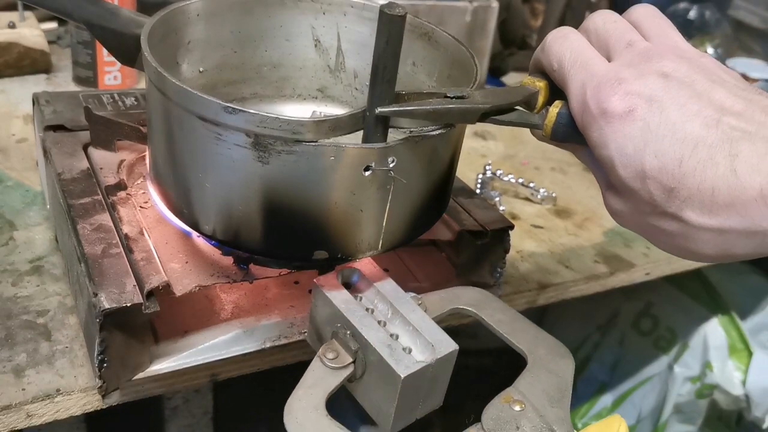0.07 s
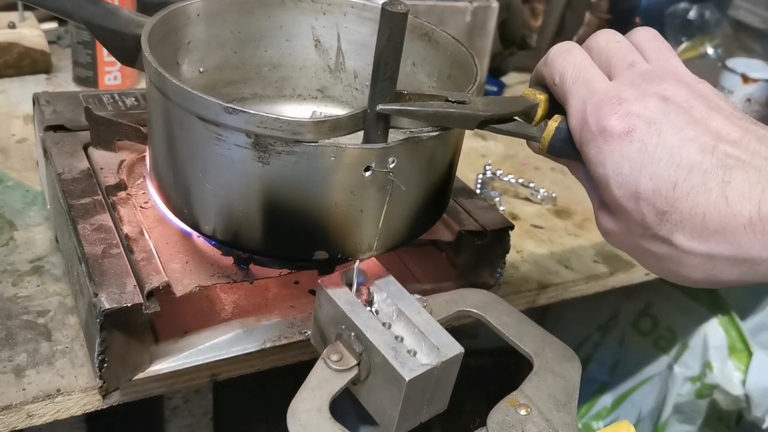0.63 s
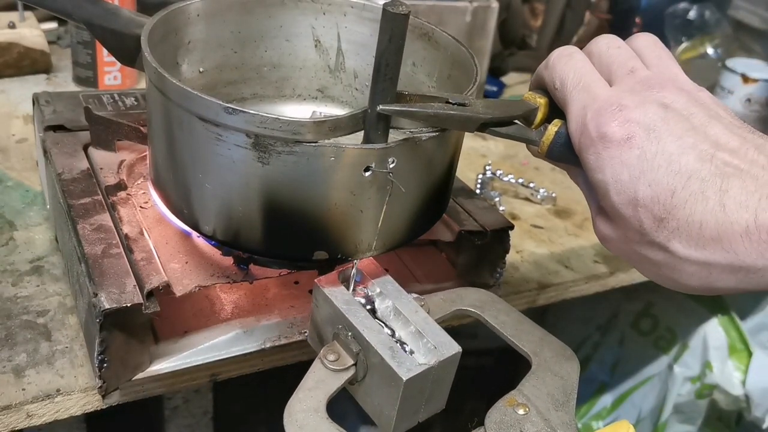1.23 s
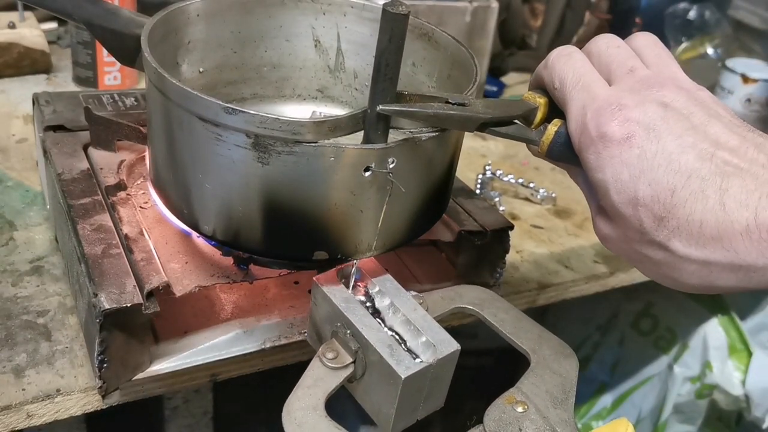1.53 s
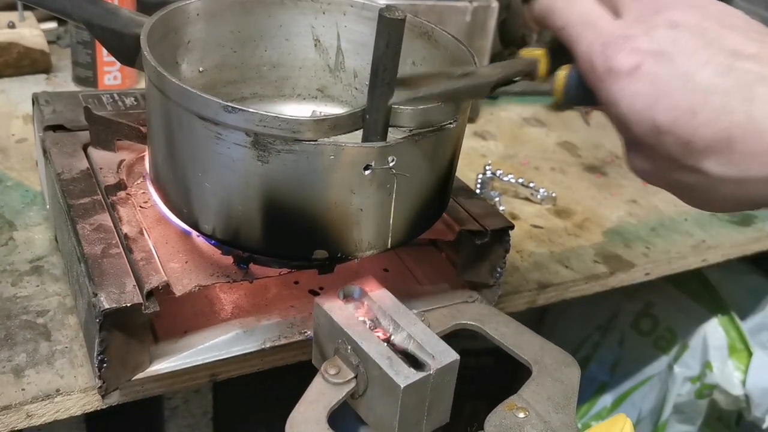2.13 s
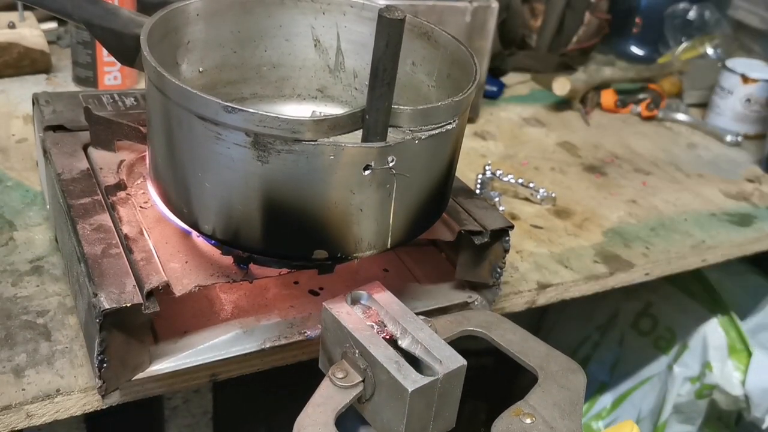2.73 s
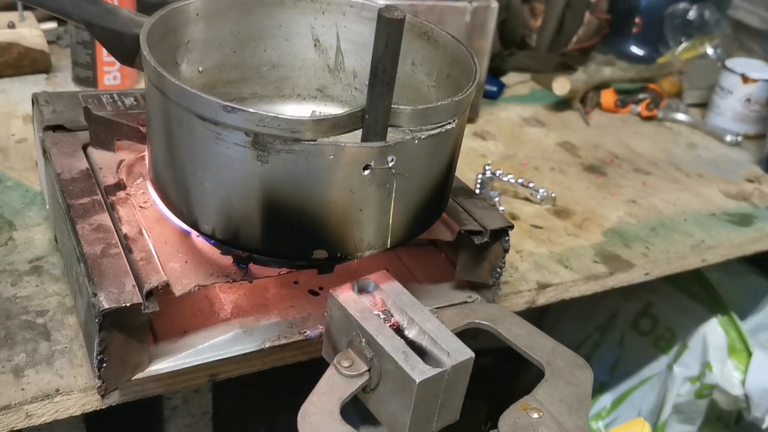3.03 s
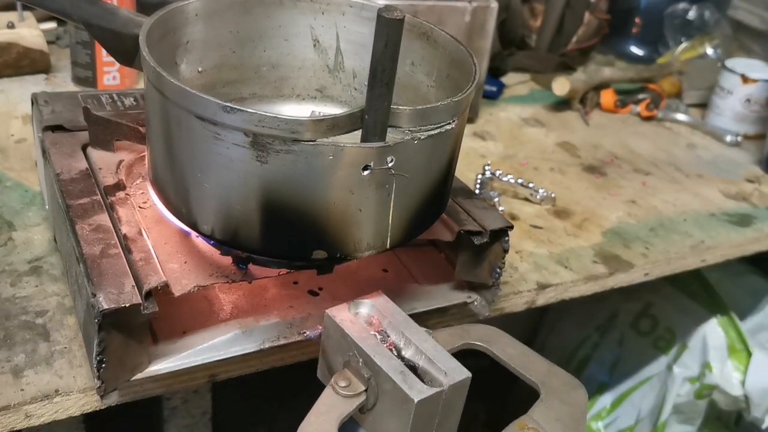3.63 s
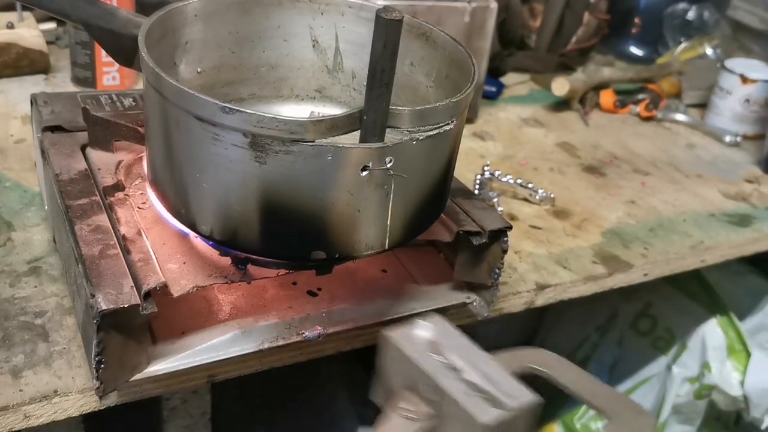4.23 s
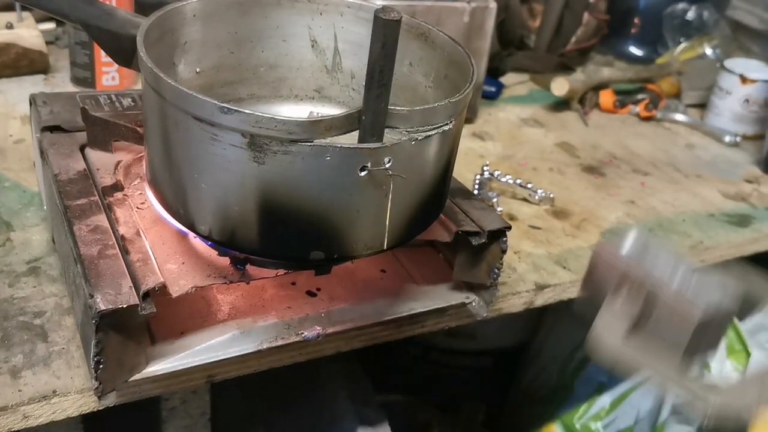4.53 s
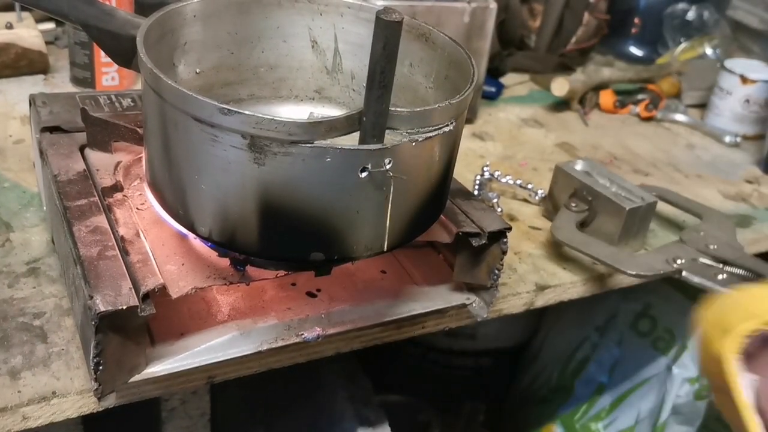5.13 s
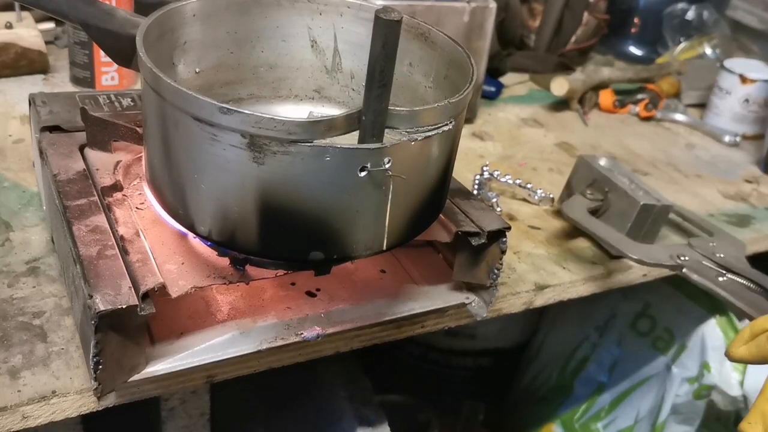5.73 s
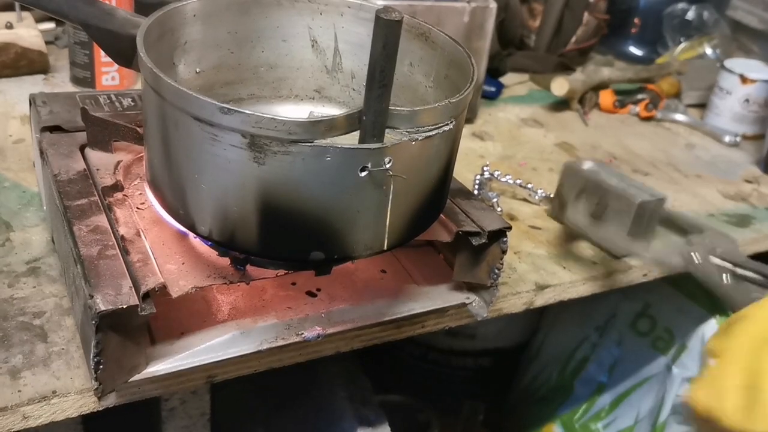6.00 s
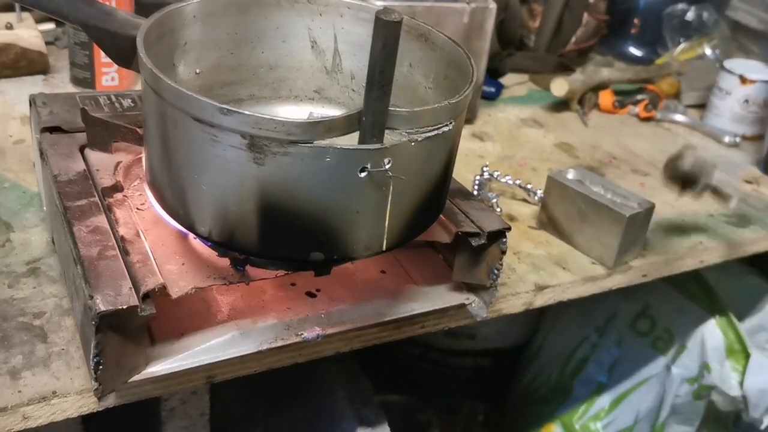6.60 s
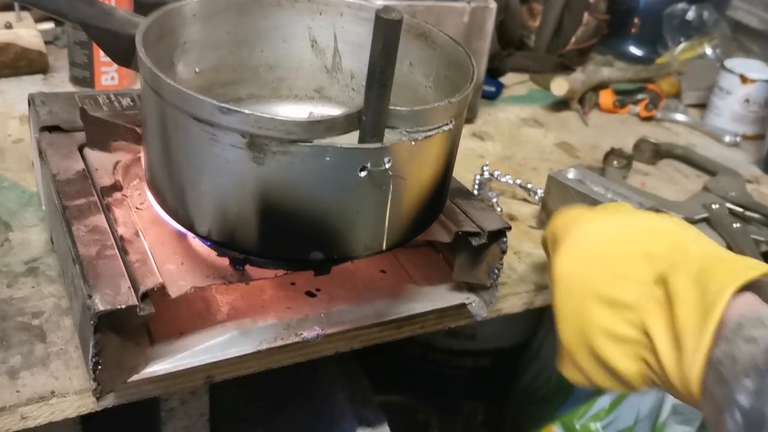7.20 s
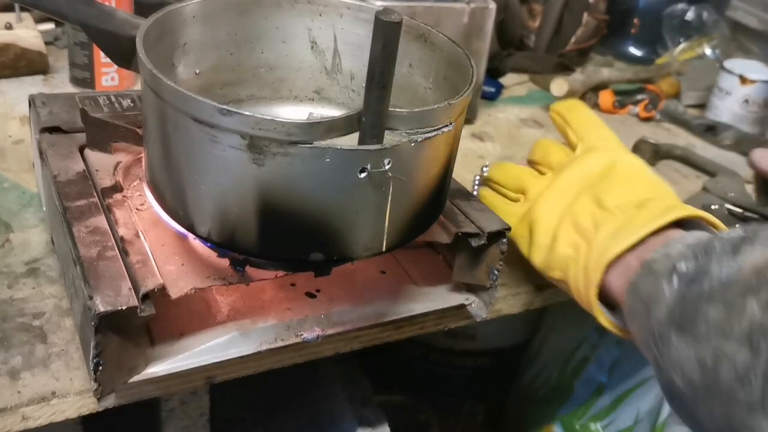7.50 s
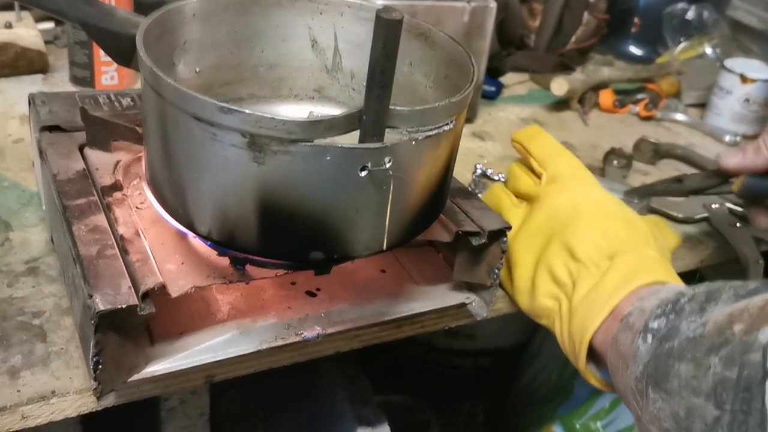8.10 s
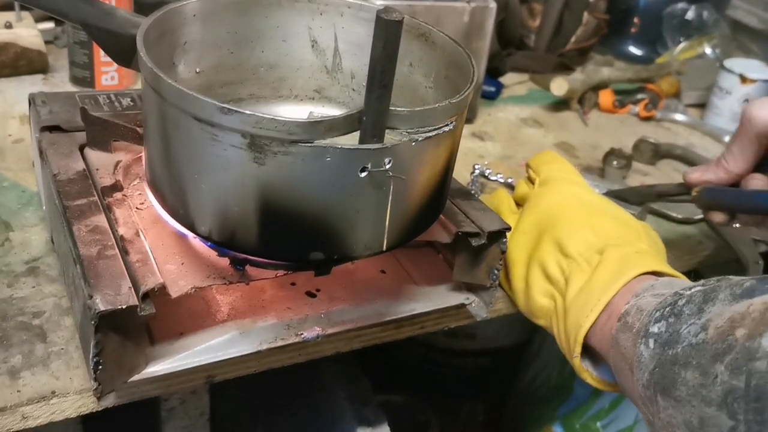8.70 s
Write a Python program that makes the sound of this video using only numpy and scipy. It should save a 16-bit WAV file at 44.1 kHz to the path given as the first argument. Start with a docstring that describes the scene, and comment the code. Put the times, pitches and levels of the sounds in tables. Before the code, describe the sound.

Tongs click on a pot, then a metal mould and locking pliers knock and clack on a wooden bench over a faint gas burner.

```python
"""Tongs click on a melting pot, which hums softly; then come hollow tocks, squeaks, clacks and thuds.
A metal casting mould in locking pliers is lifted from a gas stove and knocks down on a wooden bench;
the pliers snap open and are dropped, and a gloved hand shifts the block. Blows ring steel and wood,
friction drives slides and squeaks, and the bench booms under the heavy landings.
A small workshop echoes, and the burner rushes faintly throughout."""
import sys
import numpy as np
from scipy import signal
from scipy.fft import rfft, irfft
from scipy.io import wavfile
from scipy.ndimage import uniform_filter1d

SR = 44100
rng = np.random.default_rng(int(sys.argv[2]) if len(sys.argv) > 2 else 0)


def generate_wav(signal):
    """Clip the signal to [-1, 1] and save it as 16-bit WAV at the path in sys.argv[1]."""
    frames = np.transpose(np.atleast_2d(signal))
    scaled = np.clip(frames, -1, 1) * 32767
    pcm = np.round(scaled).astype(np.int16)
    wavfile.write(sys.argv[1], SR, pcm)


N = 385875
HIT_S = np.arange(2 ** 14) / SR  # time axis of one blow
BINS_HZ = np.fft.rfftfreq(4096, 1 / SR)
# spectrum of metal contact: f/Hz, level/dB
METAL_TONE = [(300, -33), (1000, 5), (2000, 4.5), (2800, 2), (3600, 1.5), (4300, 1.5), (5500, 3),
              (6300, 0.5), (7100, 1.5), (8000, -4), (9200, 0.5), (11000, 0.5), (13500, 0), (15500, -9)]


def plier_clacks(level_db=14, chatter_db=-4, steel_db=-1.5, rise_s=0.00019, recoil_s=0.0078, recoil_db=-8):
    """Pliers hit the mould: crack, joint chatter, ringing steel; the jaws recoil and touch again."""
    # t/s, relative level/dB, brightness centre/Hz, ring share/dB
    hits = [(4.392, -37.5, 3600, -27), (4.953, -28.5, 2000, -15), (4.974, -30.5, 8900, -18),
            (5.3106, -34, 6370, -11), (5.553, -51, 5000, -11), (5.998, -20, 4370, -13),
            (6.022, -28, 6000, -14), (6.03, -23, 6100, -4), (6.047, -15.5, 5300, -9),
            (6.091, -20, 5400, -3), (6.1036, -17, 5730, -25), (6.186, -26.5, 5100, -1),
            (6.296, -25.5, 4600, -3.5), (6.359, -27, 3860, -5), (6.9321, -19.5, 6850, -7),
            (6.953, -27, 4960, -18), (6.973, -23.5, 6100, -14), (7.003, -31.5, 6100, -7),
            (7.1205, -28, 4400, -9), (7.194, -30, 5170, -7), (7.231, -32, 3100, -29),
            (7.2664, -40.5, 4900, -17), (8.046, -38.5, 3660, -20), (8.2788, -35.5, 5400, -25),
            (8.391, -48, 4630, -31.5)]
    # f/Hz, level/dB, t60/s
    steel_modes = [(3250, -6, .11), (3424, -1, .17), (3520, -4, .12), (3591, -2, .18), (3700, -4, .12),
                   (3867, -3, .17), (4300, -7, .07), (4760, -8, .07), (5460, -7, .08), (6460, -3, .13),
                   (7067, -2, .14), (7200, -6, .1), (7470, -6, .1), (8672, -4, .12), (8950, -3, .1)]
    out = np.zeros((2, N))
    for s, db, centre_hz, ring_db in hits:
        for delay_s, loss_db in (0, 0), (recoil_s * rng.uniform(.75, 1.25), recoil_db):
            hit = crack(t60_s=0.03) + gain_of(chatter_db) * chatter(t60_s=0.17)
            hit += gain_of(ring_db + steel_db) * ring(steel_modes, scatter_db=-1.5, detune=0.0015)
            tone_db = curve(METAL_TONE) + hump(centre_hz, octaves=0.79, skirt_db=8)
            tone_db += strike_point(depth_db=3.5)
            place = pan(5.5 + rng.uniform(-1.4, 1))
            clack = radiate(hit * attack(rise_s), tone_db)
            add(out, s + delay_s, gain_of(db + loss_db + level_db) * place * clack)
    return out


def bench_knocks(level_db=20, ring_db=-7, side_db=0.5):
    """Blows on the planks: a low thud and, with harder contact, a brighter rap."""
    # t/s, relative level/dB, thud/Hz, rap over thud/dB, rap/Hz, contacts, first gap/s
    landings = [(2.053, -50, 200, -0.5, 650, 2, .019), (4.9512, -20, 262, 3, 1120, 3, .007),
                (4.989, -26, 187, -25, 900, 2, .047), (5.186, -43.5, 273, -7, 600, 1, 0),
                (5.298, -41.5, 216, -4.5, 900, 2, .086), (5.582, -28, 178, -8, 490, 2, .026),
                (6.0158, -19.5, 264, -3, 716, 1, 0), (6.045, -19, 295, 0.5, 830, 3, .019),
                (6.296, -35.5, 219, -6, 1080, 1, 0), (6.358, -29.5, 213, -3, 1010, 2, .02),
                (6.419, -32, 211, -11, 736, 1, 0), (6.928, -23.5, 272, -2, 550, 4, .018),
                (7.1, -36.5, 160, 1.5, 550, 1, 0), (7.1164, -19, 251, 0, 930, 3, .0065),
                (7.195, -31, 205, -5.5, 780, 3, .035), (7.668, -46.5, 188, -10, 520, 1, 0),
                (7.88, -31.5, 262, -7, 520, 1, 0), (8.051, -30.5, 265, -3, 550, 3, .036),
                (8.157, -32, 266, -13.5, 520, 1, 0), (8.267, -39.5, 280, -3.5, 590, 1, 0),
                (8.283, -36, 307, -5.5, 560, 2, .042), (8.397, -42, 274, -5, 585, 2, 0.042)]
    # f/Hz, level/dB, t60/s
    plank_modes = [(151.5, -5, 0.085), (184, -5.5, 0.1), (264.4, 2, 0.052), (392, -8, 0.032),
                   (426, -4, 0.044), (511, 5.5, 0.047), (576, -3, 0.11), (631, -5, 0.12), (716, -1.5, 0.06),
                   (814, -0.5, 0.06), (926, -2.5, 0.066), (1061, -10, 0.1), (1204, -8, 0.053),
                   (1320, -2, 0.042), (1780, -56, 0.043)]
    planks_db = curve([(40, -15.5), (130, 3.5), (250, 2), (310, 2.5), (400, 3.5), (950, -7),
                       (1900, -2.5), (3200, -7), (12000, -46)])
    out = np.zeros((2, N))
    for landing in landings:
        for s, db, thud_hz, hard_db, rap_hz in rocking(*landing):
            modes = gain_of(ring_db) * ring(plank_modes, scatter_db=3.5, detune=0.016)
            push = (crack(t60_s=0.12) + modes) * attack(rise_s=0.0012)
            snap = (crack(t60_s=0.039) + modes) * attack(rise_s=0.00062)
            thud = radiate(push, planks_db + hump(thud_hz, octaves=0.48, skirt_db=8.5))
            rap = radiate(snap, planks_db + hump(rap_hz, octaves=1, skirt_db=14.5))
            add(out, s, gain_of(db + level_db) * pan(side_db) * (thud + gain_of(hard_db) * rap))
    return out


def rocking(s, db, thud_hz, hard_db, rap_hz, contacts, gap_s):
    """Rebounds come sooner, weaker and softer; the thud sags, the rap nears the planks' own pitch."""
    loss_db, soften_db, sag_octaves, plank_hz = 3, 1.5, 0.1, 603
    for k in range(round(contacts)):
        sagged_hz = thud_hz / 2 ** (k * sag_octaves)
        settled_hz = plank_hz * (rap_hz / plank_hz) ** (0.25 ** k)
        yield s, db - k * loss_db, sagged_hz, hard_db - k * soften_db, settled_hz
        s += gap_s * 0.97 ** k


def bench_booms(thud_hz=102, thud_t60_s=0.13, rise_s=0.0025, side_db=3.5, highpass_hz=62):
    """The bench gives under weight: a quick thud, then its lowest modes boom on."""
    # t/s, level/dB, boom share/dB
    loads = [(4.959, -19, -14.5), (5.557, -23, -20), (5.578, -22, -18.5), (6.014, -21, -43),
             (6.053, -28.5, -8.5), (6.36, -30, -18.5), (6.93, -30, -13), (7.102, -21.5, -33.5),
             (7.12, -25.5, -13.5)]
    # f/Hz, level/dB, t60/s
    low_modes = [(96.3, -1, 1.97), (100.85, -8, 0.87), (84.3, -4.5, 0.97), (113, -4.5, 1.32),
                 (149.6, -7.5, 0.83)]
    out, t = np.zeros((2, N)), np.arange(2 * SR) / SR
    thud = decay(thud_t60_s, t) * np.sin(2 * np.pi * thud_hz * t)
    boom = sum(gain_of(db) * decay(t60_s, t) * np.sin(2 * np.pi * hz * t) for hz, db, t60_s in low_modes)
    for s, db, boom_db in loads:
        add(out, s, gain_of(db) * pan(side_db) * (thud + gain_of(boom_db) * boom) * attack(rise_s, t))
    # the deepest bass, below about 60 Hz, is filtered away
    return signal.sosfilt(signal.butter(4, highpass_hz, "high", fs=SR, output="sos"), out)


def mould_tocks(level_db=16, body_db=-3, side_db=5, dull_hz=1500, firm_db=-30, dulling=0.25):
    """Hollow blows as the clamped mould is handled; a lighter touch has less treble."""
    # t/s, relative level/dB
    touches = [(3.9907, -30), (4.186, -36.5), (4.3578, -36), (4.465, -37), (4.6412, -38.5), (6.62, -47),
               (6.732, -48), (7.4372, -37)]
    # f/Hz, level/dB
    hollow_tone = [(100, -24), (220, -8.5), (400, 6.5), (560, 7.5), (800, 0.5), (1150, 1.5), (1600, -12.5),
                   (2300, -9), (3400, -23.5), (6000, -28.5), (9000, -25.5), (14000, -38)]
    out = np.zeros((2, N))
    treble = BINS_HZ / (BINS_HZ + dull_hz)
    for s, db in touches:
        hit = (crack(t60_s=0.018) + gain_of(body_db) * crack(t60_s=0.05)) * attack(rise_s=0.00057)
        tone_db = curve(hollow_tone) + dulling * (db - firm_db) * treble
        add(out, s, gain_of(db + level_db) * pan(side_db) * radiate(hit, tone_db))
    return out


def tong_clicks(level_db=14, chatter_db=-12, ping_db=9, wall_db=-2.5, side_db=9):
    """Tongs tap the rim: a dry click, a ping of the jaws, a brief ring of the pot's thin wall."""
    # t/s, relative level/dB, brightness centre/Hz, ping/Hz, ring share/dB
    taps = [(2.0121, -32, 4360, 5180, -4), (2.0138, -26, 4060, 2730, -2.5), (2.5531, -29, 9150, 1900, -27),
            (2.5557, -33, 5960, 1860, -28)]
    # f/Hz, level/dB, t60/s
    rim_modes = [(204, -14, 0.7), (417, -5.5, 0.22), (582, -1, 0.14), (649, 3.5, 0.11), (1066, 5, 0.061),
                 (1820, -5, 0.12), (2350, -8, 0.29), (4160, 1, .1), (5130, -5, 0.051), (6460, -16, .12),
                 (9150, -0.5, 0.098), (9400, -2, .1), (10600, -13, .08)]
    click_db = curve([(200, -13), (700, -16), (1400, 0), (2000, 1.5), (3000, -9), (5300, 1),
                      (7500, -4.5), (10000, 1.5), (13000, -3), (15500, -30)])
    out = np.zeros((2, N))
    for s, db, centre_hz, ping_hz, ring_db in taps:
        hit = crack(t60_s=0.0063) + gain_of(chatter_db) * chatter(0.14, bounces_per_s=360, bed=0.47)
        tone_db = click_db + hump(centre_hz, octaves=0.46, skirt_db=5)
        tone_db += ping_db * peaks([(ping_hz, 500, 0)])
        wall = gain_of(ring_db + wall_db) * spread_hit(ring(rim_modes, scatter_db=6, detune=0.0083))
        add(out, s, gain_of(db + level_db) * pan(side_db) * (radiate(hit, tone_db) + wall))
    return out


def joint_squeaks(grit=0.13):
    """Friction excites the resonances of the pliers' joint over broad grit."""
    # t/s, length/s, level/dB
    strokes = [(4.683, 0.028, -51), (4.696, 0.033, -52.5), (4.7425, 0.0163, -51), (5.183, 0.011, -65.5)]
    # f/Hz, width/Hz, level/dB
    resonances = [(2120, 110, -7), (2340, 80, -2), (3190, 170, -8), (4870, 170, -9), (5420, 200, -4),
                  (6860, 220, -5), (7410, 240, -3), (8260, 300, -7), (9240, 240, -9)]
    response = peaks(resonances) + grit * gain_of(hump(3300, octaves=1, skirt_db=3))
    return friction(strokes, 20 * np.log10(response), slips_per_s=4500, side_db=6.5)


def slides():
    """Metal and glove scrape over the wood."""
    # t/s, length/s, level/dB
    strokes = [(4.46, 0.11, -66), (5.14, 0.32, -66.5), (5.55, 0.088, -65), (6.01, 0.14, -66),
               (6.13, 0.18, -59.5), (6.38, 0.12, -61), (6.94, 0.12, -61), (7.04, 0.17, -59),
               (7.3, 0.21, -72), (8.06, 0.25, -69.5), (8.29, 0.33, -76)]
    tone_db = curve(METAL_TONE) + hump(3100, octaves=1.3, skirt_db=8)
    return friction(strokes, tone_db, slips_per_s=1500, side_db=2)


def pot_hum():
    """The pot's low wall modes swell and fade after the tongs leave."""
    # t/s, length/s, level/dB
    swells = [(2.56, 0.14, -64.5), (2.69, 0.15, -73.5), (2.82, 0.193, -67.5)]
    # f/Hz, width/Hz, level/dB
    resonances = [(382, 32, -6.5), (441, 23, -6.5), (500, 75, -15), (597, 24, -19), (680, 15, -1.5),
                  (805, 44, -18)]
    return friction(swells, 20 * np.log10(peaks(resonances) + 1e-3), slips_per_s=3400, side_db=3)


def workshop_echo(x, onset_s=0.0011):
    """Dense reflections from bench, shelves and walls; each band decays at its own rate."""
    # f/Hz, t60/s
    decay_times = [(100, 0.78), (250, 0.29), (600, 0.48), (1500, 0.4), (4000, 0.43), (9000, 0.33),
                   (15000, 0.26)]
    noise = spread(rng.standard_normal((2, SR)), [(100, 0.91), (400, 0.79), (1200, 0.097), (3000, .05)])
    hz, t, bands = signal.stft(noise, SR, nperseg=256)
    tail = signal.istft(bands * decay(curve(decay_times, hz)[:, None], t), SR, nperseg=256)[1]
    tail *= np.clip(np.arange(tail.shape[1]) / SR / onset_s - .5, 0, 1)
    return signal.fftconvolve(x, unit_energy(tail), axes=1)[:, :N]


def burner(rush_db=-64.5, whine_db=-83, flutter_db=3.5, flutter_max_hz=9, rumble_hz=300):
    """Gas flame: fluttering rumble under a steady hiss with faint whistles."""
    # f/Hz, relative level/dB
    flame_tone = [(12, -45), (20, 0), (103, -6.5), (126, -17), (245, -13.5), (372, -23), (667, -19.5),
                  (1270, -28), (1580, -26.5), (1920, -30.5), (3850, -29), (6360, -36.5), (7110, -34.5),
                  (7730, -33), (15500, -32)]
    # f/Hz, width/Hz, level/dB
    whistles = [(1610, 71, 0.5), (3136, 43, 1.5), (5065, 61, 2), (7120, 51, 3), (8500, 190, -9.5),
                (9170, 120, -5.5), (12600, 580, -8.5)]
    # f/Hz, left-right coherence
    air_coherence = [(60, 1), (180, 0.85), (550, 0.24), (1650, -0.15), (4970, 0.0075), (15000, -0.066)]
    # f/Hz, left minus right/dB
    balance = [(60, 6.3), (180, 5.7), (550, 0.42), (1650, 2.9), (4970, 9.2), (15000, 2)]
    hz = np.fft.rfftfreq(N, 1 / SR)
    air = rfft(spread(rng.standard_normal((2, N)), air_coherence))
    flame = irfft(air * gain_of(curve(flame_tone, hz)) * pan(curve(balance, hz)), N)
    rush = gain_of(rush_db) * unit_rms(flame)
    rumble = irfft(rfft(rush) / (1 + (hz / rumble_hz) ** 2), N)
    flutter = unit_rms(irfft(rfft(rng.standard_normal(N)) * (hz < flutter_max_hz), N))
    whine = gain_of(whine_db) * unit_rms(irfft(air * peaks(whistles, hz), N))
    return rush + rumble * (gain_of(flutter_db * np.tanh(flutter)) - 1) + whine


def crack(t60_s):
    """A blow's crowd of heavily damped modes, as decaying noise."""
    return unit_energy(rng.choice([-1., 1.], (2, len(HIT_S))) * decay(t60_s))


def chatter(t60_s, bounces_per_s=500, bed=0.64):
    """Loose parts rebound unevenly as a blow dies away."""
    bounces = (rng.random(len(HIT_S)) < bounces_per_s / SR) + bed
    return unit_energy(rng.choice([-1., 1.], (2, len(HIT_S))) * bounces * decay(t60_s))


def ring(modes, scatter_db, detune):
    """Decaying modes; level and phase vary with the strike point, pitch with the grip."""
    hz, db, t60_s = np.transpose(modes)[:, :, None]
    hz = hz * (1 + detune * rng.standard_normal(hz.shape))
    gains = gain_of(db + scatter_db * rng.standard_normal(hz.shape))[:, 0]
    phasors = np.exp(2j * np.pi * rng.random((2, len(hz))))
    partials = np.exp((2j * np.pi * hz - np.log(1000) / t60_s) * HIT_S)
    return unit_energy(((gains * phasors) @ partials).real)


def strike_point(depth_db):
    """Spectral ripple/dB: each contact point favours other groups of modes."""
    ripple = uniform_filter1d(rng.standard_normal(len(BINS_HZ)), size=30)
    return depth_db * unit_rms(uniform_filter1d(ripple, size=18))


def friction(strokes, tone_db, slips_per_s, side_db):
    """Tiny uneven slips drive the resonances while a stroke lasts."""
    slips = (rng.random(N) < slips_per_s / SR) * rng.standard_normal((2, N))
    pressure = np.zeros((2, N))
    for s, length_s, db in strokes:
        add(pressure, s, gain_of(db) * signal.windows.tukey(round(length_s * SR), .5))
    steady_rms = np.sqrt(np.mean(colour(slips, tone_db) ** 2))
    return pan(side_db) * colour(spread(slips) * pressure, tone_db) / steady_rms


def radiate(hit, tone_db):
    """A blow in stereo, filtered, at unit energy."""
    return unit_energy(colour(spread_hit(hit), tone_db))


def spread_hit(hit):
    """Stereo spread, zero-padded to keep the onset sharp."""
    return spread(np.pad(hit, ((0, 0), (0, len(HIT_S)))))[:, :len(HIT_S)]


def spread(two, coherence=None):
    """Two independent signals become partly coherent stereo, the right slightly late."""
    # f/Hz, left-right coherence
    direct_coherence = [(100, 1), (400, 0.87), (1000, 0.9), (2200, 0.089), (7000, 0.085), (14000, 0.24)]
    # f/Hz, right lag/rad
    phase_lag = [(60, .15), (250, 0.043), (600, 0.28), (1500, 0.89), (3500, 0.75), (7000, 2), (15000, 4.7)]
    size = two.shape[1]
    hz, (left, other) = np.fft.rfftfreq(size, 1 / SR), rfft(two)
    shared = np.clip(curve(coherence or direct_coherence, hz), -1, 1)
    right = (shared * left + np.sqrt(1 - shared ** 2) * other) * np.exp(-1j * curve(phase_lag, hz))
    return irfft(np.array([left, right]), size)


def colour(x, db):
    """Minimum-phase filter of shape db on BINS_HZ, peak gain 1."""
    log_gain = np.log(gain_of(np.maximum(db - db.max(), -90)))
    mirrored = np.concatenate([log_gain, log_gain[-2:0:-1]])
    taps = np.fft.ifft(np.exp(np.conj(signal.hilbert(mirrored)))).real[:len(BINS_HZ)]
    return signal.fftconvolve(x, taps[None], axes=1)[:, :x.shape[1]]


def hump(centre_hz, octaves, skirt_db):
    """Broad peak/dB with straight skirts."""
    return -skirt_db * (np.hypot(1, np.log2((BINS_HZ + 1) / centre_hz) / octaves) - 1)


def peaks(resonances, hz=BINS_HZ):
    """Summed linear gain of resonances."""
    return sum(gain_of(db) / (1 + (2 * (hz - f) / width_hz) ** 2) for f, width_hz, db in resonances)


def curve(points, hz=BINS_HZ):
    """Interpolates (f/Hz, value) points over log frequency."""
    f, value = np.transpose(points)
    return np.interp(np.log(hz + 1), np.log(f + 1), value)


def attack(rise_s, t=HIT_S):
    return 1 - np.exp(-t / rise_s)


def decay(t60_s, t=HIT_S):
    return gain_of(-60 * t / t60_s)


def gain_of(db):
    return 10 ** (np.asarray(db) / 20)


def unit_rms(x):
    return x / np.sqrt(np.mean(x ** 2) + 1e-20)


def unit_energy(x):
    return unit_rms(x) / np.sqrt(x.shape[-1])


def pan(side_db):
    """Channel gains for left minus right/dB."""
    return gain_of(np.array([[.5], [-.5]]) * side_db)


def add(mix, start_s, sound):
    part = mix[:, round(start_s * SR):][:, :sound.shape[-1]]
    part += sound[..., :part.shape[1]]


def scene():
    """The handling, its workshop echo and the burner."""
    clicks, steel, wood, tocks = tong_clicks(), plier_clacks(), bench_knocks(), mould_tocks()
    scrapes, squeaks = slides(), joint_squeaks()
    echo = workshop_echo(gain_of(-15) * clicks + gain_of(-9) * (steel + scrapes) + gain_of(-7) * squeaks
                         + gain_of(-4.5) * wood + gain_of(-5) * tocks)
    direct = clicks + steel + wood + tocks + scrapes + squeaks + bench_booms() + pot_hum()
    return direct + echo + burner()


def record(dry):
    """Steep low-pass."""
    edge_hz = 15800
    taps = signal.firwin(511, edge_hz, window=("kaiser", 9), fs=SR)
    return signal.oaconvolve(dry, taps[None], "same")


dry = scene()
out = record(dry)
generate_wav(out)
```